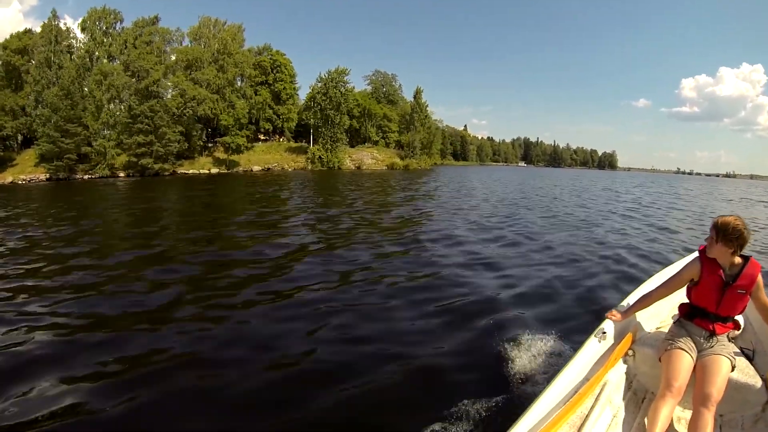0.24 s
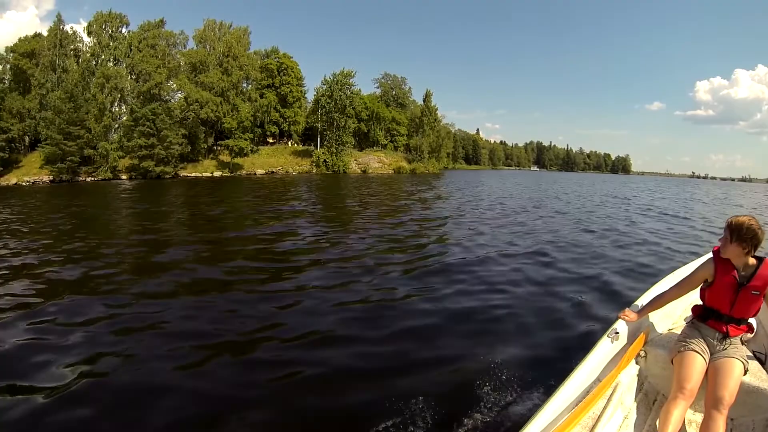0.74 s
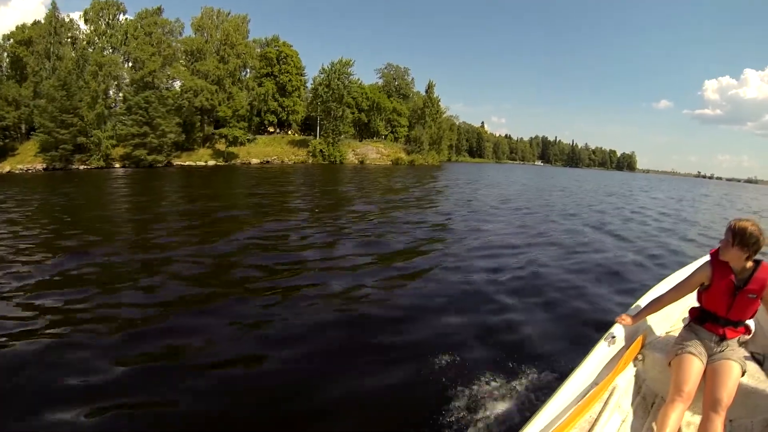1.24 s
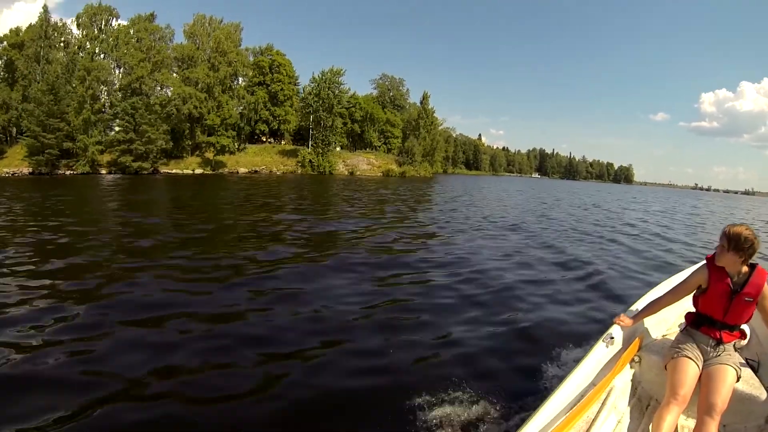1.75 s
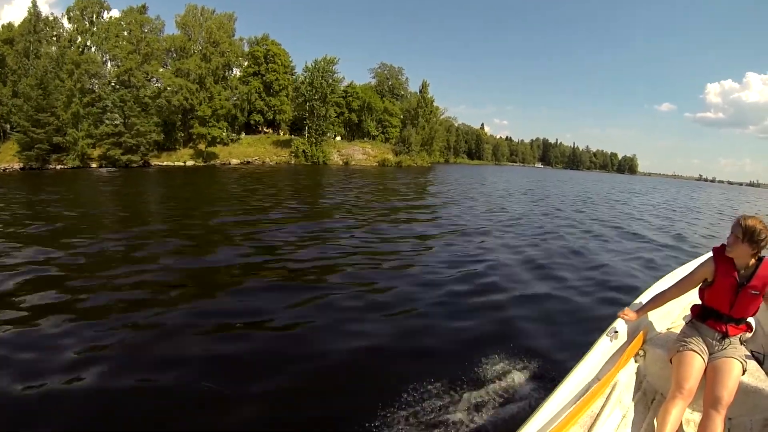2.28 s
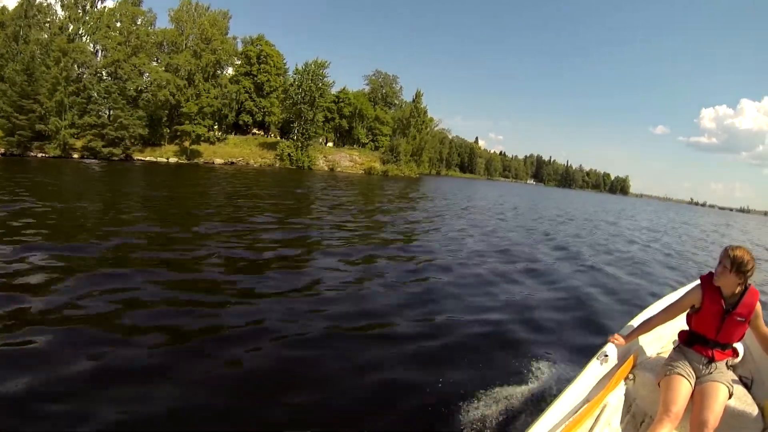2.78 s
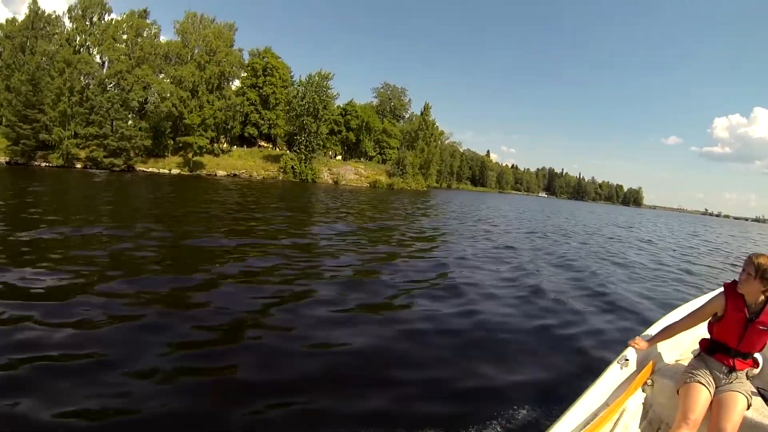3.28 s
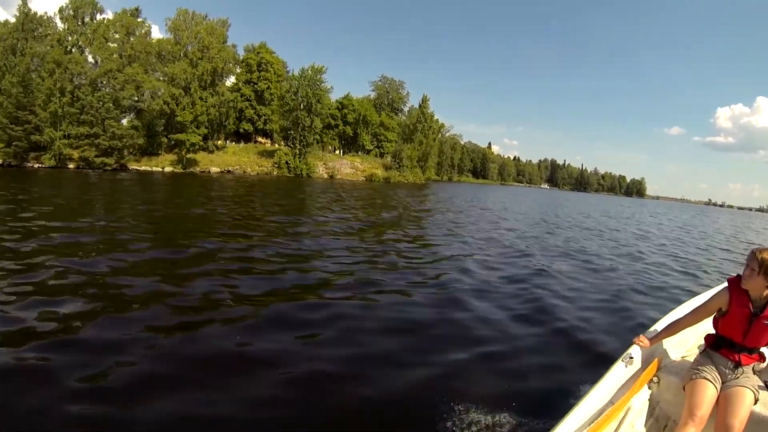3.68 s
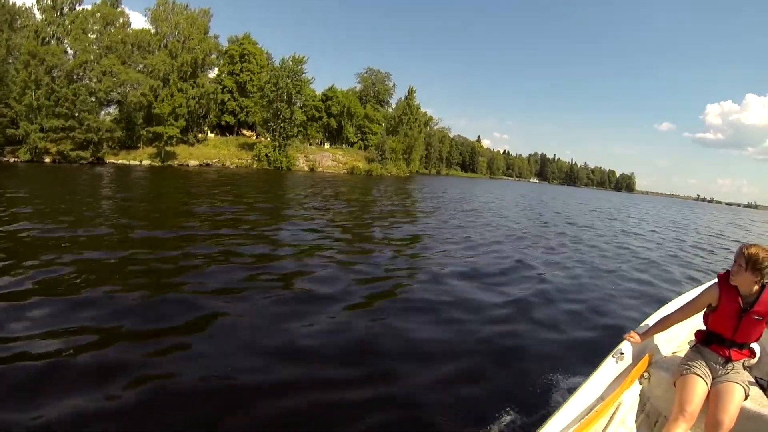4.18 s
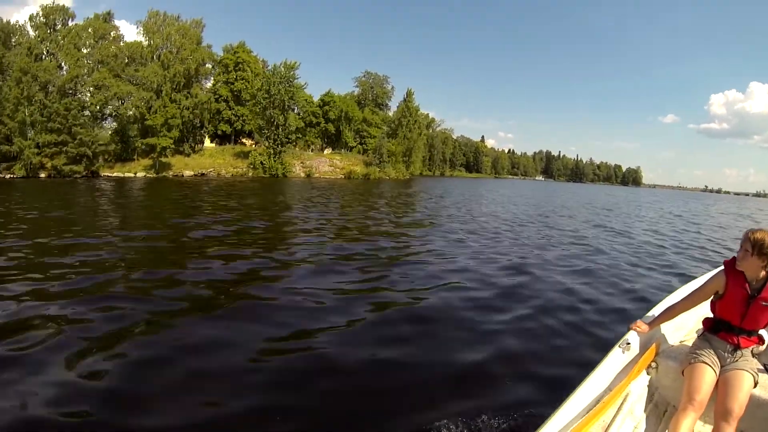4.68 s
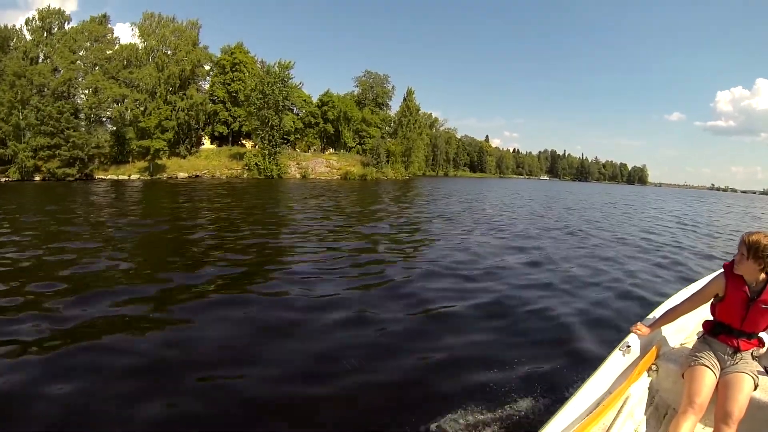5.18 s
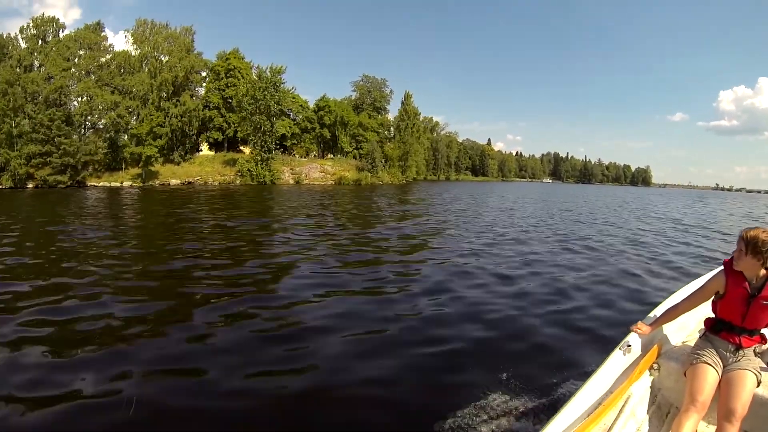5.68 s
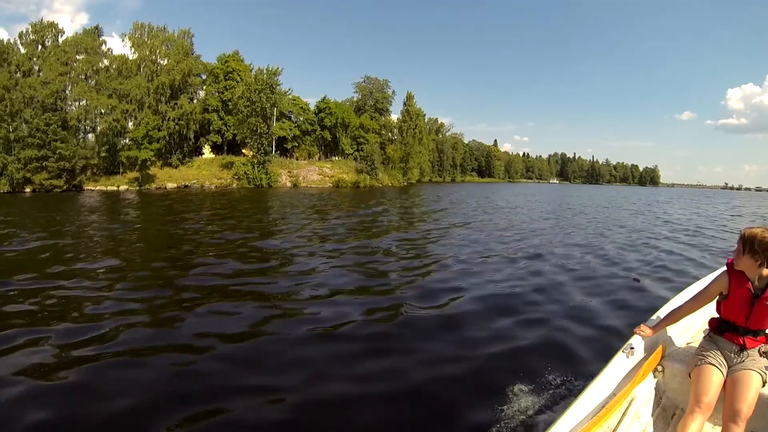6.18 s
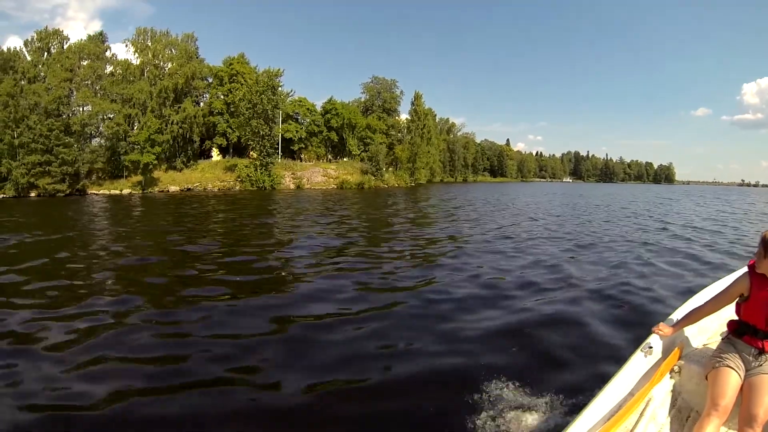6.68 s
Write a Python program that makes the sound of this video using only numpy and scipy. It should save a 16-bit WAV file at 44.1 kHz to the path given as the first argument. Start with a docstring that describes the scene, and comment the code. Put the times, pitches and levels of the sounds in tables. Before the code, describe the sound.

A small single-cylinder outboard motor pushes an open boat across a lake, running throughout with a rapid thumping exhaust, a low hull hum and a metallic clatter. Its pitch rises slightly in the first second or so, then holds. Small waves briefly lift the rattle and a very faint hiss of spray. A light breeze puffs now and then on the microphone aboard the boat.

```python
"""A small single-cylinder four-stroke outboard motor pushes an open boat across a calm lake.
It picks up a little speed. Once a cycle the exhaust thumps and the burning fuel knocks the engine
block; the crank shakes the hull at twice that rate. Valves and gears clatter. Each small wave throws
spray and makes the motor rattle louder, and a light breeze puffs on the microphone."""
import sys
import numpy as np
from scipy import signal
from scipy.fft import rfft, irfft
from scipy.io import wavfile
from scipy.ndimage import uniform_filter1d

SR = 44100
rng = np.random.default_rng(int(sys.argv[2]) if len(sys.argv) > 2 else 0)


def bounce(signal):
    """Save signal as a 16-bit WAV file at the path given by the first command-line argument."""
    frames = np.transpose(np.atleast_2d(signal))
    limited = np.clip(frames, -1, 1)
    pcm = np.round(limited * 32767).astype(np.int16)
    wavfile.write(sys.argv[1], SR, pcm)


N = 306054
START_AT, EXHAUST_AT, KNOCK_AT, VALVE_AT = .113, .2, .607, .887   # moments in an engine cycle, 0 to 1


def from_db(db):
    """Turn decibels into a number to multiply by."""
    return 10 ** (np.asarray(db) / 20)


def unit_power(x):
    """Scale a signal so that its average power is 1."""
    return x / np.sqrt(np.mean(x ** 2) + 1e-20)


def steady(x, size=SR // 6):
    """Even out the level over a few engine cycles."""
    return x / np.sqrt(uniform_filter1d(x ** 2, size) + 1e-9)


def curve(rows):
    """Join (time, value) points with straight lines."""
    return np.interp(np.arange(N) / SR, *np.transpose(rows))


def drift(rate, size=8192):
    """A smooth random wobble of about 1 that changes about rate times a second."""
    hz = np.arange(size // 2 + 1) * SR / N
    spectrum = rfft(rng.standard_normal(size)) / (1 + (hz / rate) ** 4)
    slow = unit_power(irfft(spectrum, size))
    return np.interp(np.arange(N) * size / N, np.arange(size), slow)


def slope(db_per_s):
    """A level in dB that changes evenly, passing 0 halfway through the sound."""
    return db_per_s * (np.arange(N) - N / 2) / SR


def slope_band(x, hz, q, db_per_s):
    """Slowly turn one band of a sound up or down; a higher q makes the band narrower."""
    band = signal.lfilter(*signal.iirpeak(hz, q, fs=SR), x)
    return x + (from_db(slope(db_per_s)) - 1) * band


def burst(cycles, moment, decay):
    """A level that jumps at one moment of each cycle and dies away."""
    return np.exp(-((cycles - moment) % 1) / decay)


def noise(tone, pulse=1):
    """Pulsed noise, shaped by a tone table and falling steeply beyond the table's ends."""
    hz = np.maximum(np.arange(N // 2 + 1) * SR / N, 1)
    points, db = np.transpose(tone)
    edges = np.minimum(1, np.minimum(hz / points[0], points[-1] / hz)) ** 4
    gain = from_db(np.interp(np.log(hz), np.log(points), db)) * edges
    return unit_power(irfft(rfft(rng.standard_normal(N) * pulse) * gain, N))


def ring(clicks, hz, ring_s):
    """Each click starts a pure tone that fades by 60 dB in ring_s seconds."""
    fade = np.exp(-np.log(1000) / (ring_s * SR))
    angle = 2 * np.pi * hz / SR
    return signal.lfilter([0, np.sin(angle)], [1, -2 * fade * np.cos(angle), fade ** 2], clicks + 1e-18)


def strike(cycles, blows, notes, polarity, blow_db, note_db, wander_db, jitter_s):
    """Blows (moment [cycles], level at 1 kHz [dB], tilt [dB/octave]) ring notes, never twice alike."""
    hits = [np.flatnonzero(np.diff(np.floor(cycles - blow[0]))) for blow in blows]
    _, force_db, tilt_db = np.repeat(blows, [len(h) for h in hits], axis=0).T
    chance = rng.standard_normal((len(force_db), len(notes) + 2))
    jitter = np.round(jitter_s * SR * chance[:, -1]).astype(int)
    at = np.clip(np.concatenate(hits) + jitter, 0, N - 1)
    ringing = np.zeros(N)
    for k, (hz, db, ring_s) in enumerate(notes):
        # chance per blow and per note, plus a slow wander as the boat rocks
        uneven_db = blow_db * chance[:, -2] + note_db * chance[:, k] + wander_db * drift(5.3)[at]
        clicks = np.zeros(N)
        clicks[at] = from_db(db + force_db + tilt_db * np.log2(hz / 1000) + uneven_db)
        ringing += polarity ** k * ring(clicks, hz, ring_s)
    return steady(signal.sosfilt(signal.butter(4, 2100, fs=SR, output="sos"), ringing))


# How fast the motor runs: (time [s], firing rate [Hz])
FIRING_RATE = [(0.0, 37.753), (0.63, 38.218), (1.26, 39.397), (1.42, 39.164), (1.77, 39.439), (2.6, 39.201),
               (3.35, 39.579), (3.63, 39.276), (4.14, 39.576), (4.38, 39.256), (4.81, 39.148),
               (4.95, 39.216), (5.36, 39.54), (6.09, 39.475), (6.31, 39.64), (6.94, 39.273)]


def motor_timing():
    """The motor fires once a cycle: count the cycles, and give the rate above its average in Hz."""
    firing_hz = curve(FIRING_RATE)
    return START_AT + np.cumsum(firing_hz) / SR, firing_hz - firing_hz.mean()


# How strongly the hull hums: (time [s], relative level [dB])
HUM_LEVEL = [(0.0, -23), (0.2, -22), (1.54, -22), (1.62, -27), (1.78, -19.5), (2.05, -19), (2.17, -26),
             (3.39, -19.5), (3.53, -23.5), (4.1, -24.1), (4.22, -21), (4.38, -23.9), (4.61, -18.5),
             (4.73, -25.8), (5.29, -25.1), (5.56, -20.5), (6.37, -25), (6.94, -20.5)]


def hull_hum(cycles):
    """The unbalanced crank turns twice a cycle and shakes the hull with an almost pure tone."""
    level_db = curve(HUM_LEVEL) + 0.8 + 0.57 * drift(11)
    return from_db(level_db) * np.sqrt(2) * np.cos(4 * np.pi * cycles)


# The tone of the bubbling gas: (frequency [Hz], relative level [dB])
GURGLE_TONE = [(60, -26), (110, -7), (170, -5), (210, 0.5), (260, -0.5), (340, 0), (400, -7.5),
               (470, -23.5)]


def gurgle(cycles):
    """Exhaust gas bubbles out under water in pulses, easing as the boat gets under way."""
    pulse = 2 + burst(cycles, moment=0.47, decay=0.82)
    return from_db(-9 + slope(db_per_s=-0.24)) * noise(GURGLE_TONE, pulse)


# The notes of the exhaust and hull: (frequency [Hz], relative level [dB], ring time [s])
EXHAUST_NOTES = [(124.2, -19.5, 0.076), (140.1, -19.5, 0.055), (185.5, -26, 0.19), (244.9, -10, 0.11),
                 (259.4, -14.5, 0.049), (305, -21.5, 0.13), (357.2, -9.5, 0.07)]
# How strongly one hull panel booms: (time [s], relative level [dB])
BOOM_LEVEL = [(0.0, -23.5), (0.73, -21), (0.79, -38), (0.91, -24), (1.36, -38), (1.82, -22), (1.95, -32),
              (2.52, -23), (3.43, -27.5), (3.49, -20.5), (4.65, -26.5), (4.81, -21), (5.44, -22),
              (6.94, -21)]


def exhaust(cycles, level_db):
    """A thump and a gurgle each cycle; one hull panel booms more or less as the boat rolls."""
    thump = strike(cycles, [(EXHAUST_AT, 0, 0)], EXHAUST_NOTES, polarity=-0.95,
                   blow_db=0, note_db=0.85, wander_db=2, jitter_s=.00008)
    panel = signal.lfilter(*signal.iirpeak(274, Q=11, fs=SR), thump)   # the panel booms at 274 Hz
    pipe = from_db(-1.41) * steady(thump - panel, size=SR // 13) + gurgle(cycles)
    boom = from_db(curve(BOOM_LEVEL) + 0.5) * steady(panel)
    return slope_band(from_db(level_db) * pipe + boom, hz=167, q=2.1, db_per_s=-0.74)   # the bass eases


# Metal parts meeting in each cycle: (moment [cycles], relative level [dB], fade time [cycles])
METAL_TAPS = [(0.288, -4.5, 0.41), (.6, -46, 0.041), (0.801, -10, 0.049), (0.911, -5.5, 0.18)]
# The tone of the clatter: (frequency [Hz], relative level [dB])
CLATTER_TONE = [(1100, -13), (1400, -6.5), (1700, 1), (1980, 1), (2250, -6.5), (2600, -8.5), (3200, -9.5),
                (3900, -11.5), (4500, -22), (5100, -17.5), (6300, -31), (7500, -39), (10000, -40.5)]


def clatter(cycles, level_db, whirr=1.0, uneven_db=3.5):
    """Gears whirr steadily; valves and piston add uneven taps at set moments of the cycle."""
    taps = sum(from_db(db + uneven_db * drift(31)) * burst(cycles, moment, decay)
               for moment, db, decay in METAL_TAPS)
    return from_db(level_db) * noise(CLATTER_TONE, whirr + taps)


# The notes of the engine block and its cover: (frequency [Hz], relative level [dB], ring time [s])
BLOCK_NOTES = [(409, -35, .2), (523, -28.3, .075), (580, -31, .071), (651, -27.5, .065), (748, -27, .115),
               (807, -29.3, .05), (1023, -19.6, .043), (1113, -20.8, .056), (1175, -34, .134),
               (1395, -28.5, .018), (1580, -30, .065), (1705, -33.5, .08), (1857, -36, .05),
               (2017, -45, .03)]
# The tone of the rattling cover: (frequency [Hz], relative level [dB])
COVER_TONE = [(400, 5), (520, 0.5), (720, 0), (880, 1), (1050, 4.5), (1200, -6.5), (1350, -4)]


def engine_knock(cycles, extra_hz, level_db):
    """Firing knocks the block and a closing valve adds a duller blow; the cover rattles along."""
    blows = [(KNOCK_AT, 0, 0), (VALVE_AT, -6.2, -12)]
    block = strike(cycles, blows, BLOCK_NOTES, polarity=0.99,
                   blow_db=1.07, note_db=0.9, wander_db=1.63, jitter_s=.00002)
    force = from_db(1 + extra_hz)   # 1 dB harder for each extra firing a second
    shaking = 5.7 + burst(cycles, KNOCK_AT, decay=.2) + burst(cycles, VALVE_AT, decay=0.38)
    cover = from_db(-5) * noise(COVER_TONE, shaking)
    knock = from_db(level_db) * (force * block + cover)
    knock = slope_band(knock, hz=555, q=2.2, db_per_s=-0.5)   # the cover's low ring eases
    return slope_band(knock, hz=734, q=20, db_per_s=0.65)   # one ring of the block grows


# The tone of the valve's tick: (frequency [Hz], relative level [dB])
TICK_TONE = [(8000, -7), (10500, -7), (12500, 0), (14500, -5)]


def valve_tick(cycles, level_db, uneven_db=4):
    """Each closing of the valve adds a tiny, very high tick."""
    gain = from_db(level_db + uneven_db * drift(25))
    return gain * burst(cycles, VALVE_AT, decay=.045) * noise(TICK_TONE)


# The tone of the spray's fizz, coloured by two high resonances of the camera housing:
# (frequency [Hz], relative level [dB])
FIZZ_AND_HOUSING_TONE = [(3000, -19), (6500, 8), (7300, -9), (8100, -5), (8700, 4.5), (9800, -4.5),
                         (11600, 4.5), (12800, -5), (13500, -2), (15000, -10)]


def spray(level_db, drops_per_s=150):
    """A fine fizz of spray, with single drops ticking back onto the lake."""
    fizz = noise(FIZZ_AND_HOUSING_TONE, from_db(1.4 * drift(120)))
    landings = (rng.random(N) < drops_per_s / SR) * rng.uniform(.3, 1, N)
    drops = noise(FIZZ_AND_HOUSING_TONE, uniform_filter1d(landings, size=60))
    return from_db(level_db) * (fizz + from_db(-4.5) * drops)


def swell(peak_s, length_s):
    """A smooth rise from 0 to 1 and back."""
    progress = np.clip((np.arange(N) / SR - peak_s) / length_s, -.5, .5)
    return np.cos(np.pi * progress) ** 2


# Small waves meeting the boat: (peak time [s], length [s], extra rattle [dB], extra spray [dB])
SMALL_WAVES = [(0.25, 0.26, 2, 5), (.52, 0.61, 1.5, 2.5), (0.922, 0.53, 0.5, 1), (1.435, 0.33, 1.5, 3),
               (1.705, .3, 2, 2), (2.07, 0.18, 2.5, 1.5), (2.56, 0.2, 3, 5.5), (2.778, 0.54, 2.5, 4.5),
               (3.166, 0.34, 3, 3), (3.46, 0.14, 2.5, 5), (3.648, 0.21, 2.5, 4), (4.222, 0.31, 2, 4.5),
               (4.536, 0.29, 3.5, 2.5), (4.712, 0.23, 2.1, 3), (5.133, 0.14, 0.5, 0), (5.45, 0.37, 0.5, .5),
               (5.98, 0.34, 3, 2), (6.293, 0.2, 3, 1.5), (6.68, .28, 2.5, 3)]


def waves():
    """Each wave shakes the motor and throws spray: give both rises in level, in dB."""
    shake_db = sum(db * swell(peak_s, length_s) for peak_s, length_s, db, _ in SMALL_WAVES)
    splash_db = sum(db * swell(peak_s, length_s) for peak_s, length_s, _, db in SMALL_WAVES)
    return shake_db, splash_db


# The tone of the wind's rumble: (frequency [Hz], relative level [dB])
BREEZE_TONE = [(12, -9), (22, 6), (42, 1), (60, 1), (120, -0.5)]
# Puffs of wind: (peak time [s], length [s], extra level [dB])
WIND_PUFFS = [(1.14, .2, 14), (1.66, 0.17, 12), (1.87, .25, 12), (4.05, .2, 9), (4.25, 0.27, 16),
              (5.6, .25, 11)]


def breeze(level_db):
    """Wind on the microphone makes a low, wavering rumble that swells with each puff."""
    puff_db = sum(db * swell(peak_s, length_s) for peak_s, length_s, db in WIND_PUFFS)
    return from_db(level_db + puff_db - 2.5 * drift(9.7)) * noise(BREEZE_TONE)


def scene():
    """Motor, spray and breeze in the open air; each wave lifts the rattle and the spray."""
    cycles, extra_hz = motor_timing()
    shake_db, splash_db = waves()
    # the exhaust grows with speed and dips when a wave covers its outlet
    exhaust_db = -16 + 0.5 * extra_hz - 0.17 * shake_db + 1.15 * drift(9.7)
    # the rattle eases as the boat gets under way
    rattle_db = shake_db + slope(db_per_s=-0.22) + 0.22 * drift(9.7)
    spray_db = -59.5 + splash_db + 0.7 * drift(9.7)
    motor = exhaust(cycles, exhaust_db)
    motor += engine_knock(cycles, extra_hz, level_db=-24 + rattle_db)
    motor += clatter(cycles, level_db=-32.5 + rattle_db)
    motor += valve_tick(cycles, level_db=-61 + 1.3 * rattle_db)
    return (motor + hull_hum(cycles) + spray(spray_db) + breeze(level_db=-38))[None]


def record(dry, low_hz=12, high_hz=15200):
    """Drop the deepest bass, end without a click and cut the highest treble steeply."""
    dry = signal.sosfilt(signal.butter(2, low_hz, "high", fs=SR, output="sos"), dry)
    fade_out = np.minimum(1, np.arange(N)[::-1] / (.003 * SR))
    return signal.sosfilt(signal.ellip(10, .2, 80, high_hz, fs=SR, output="sos"), dry * fade_out)


dry = scene()
out = record(dry)
bounce(out)
```